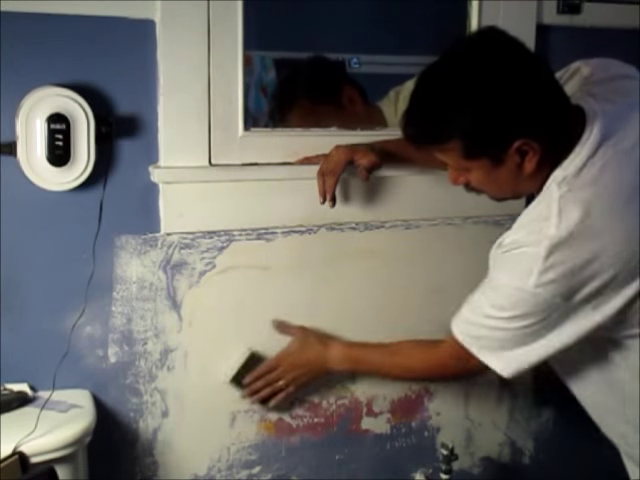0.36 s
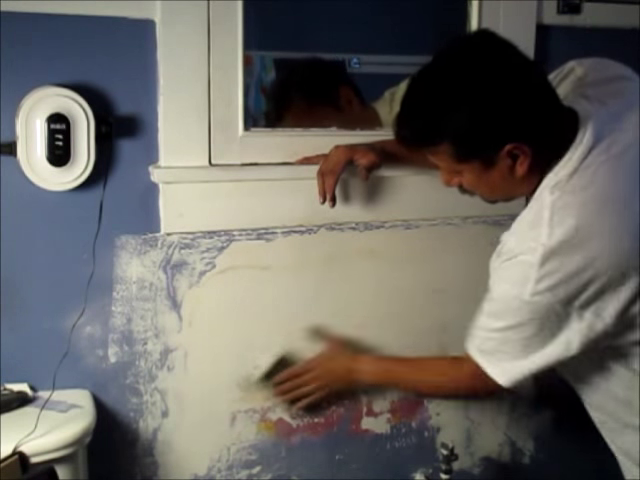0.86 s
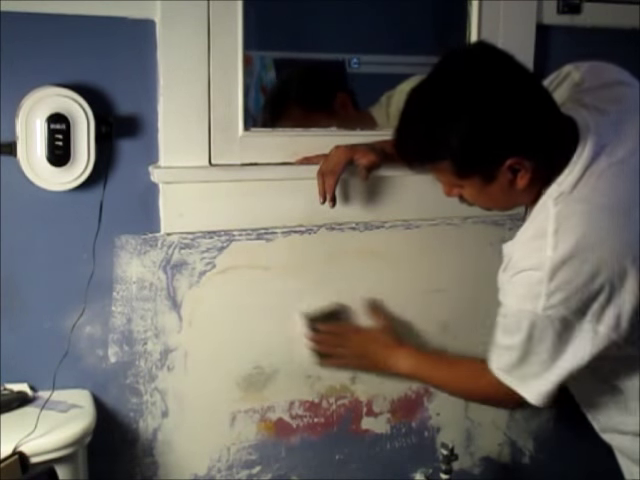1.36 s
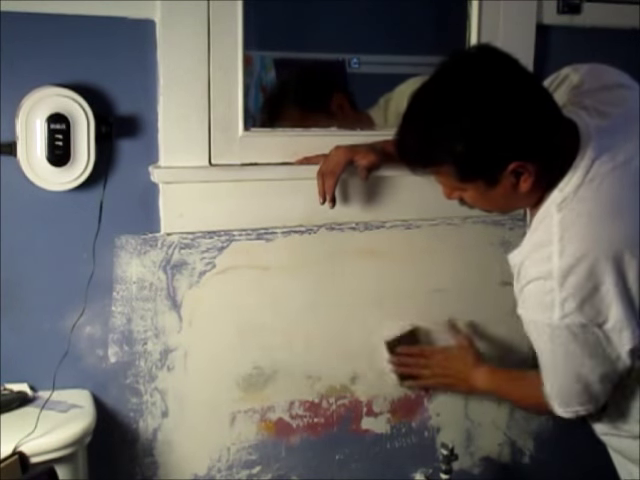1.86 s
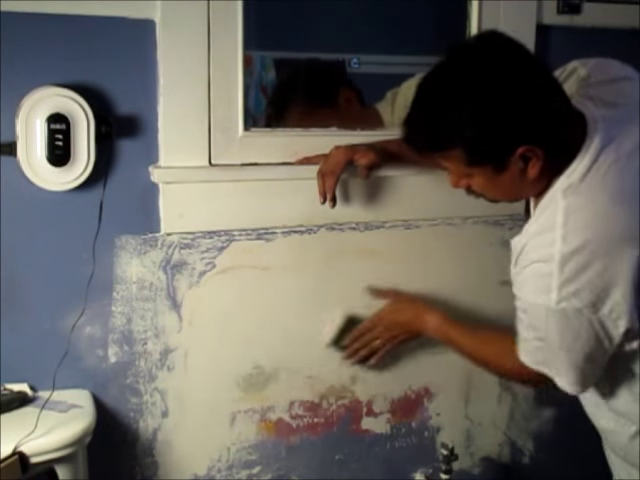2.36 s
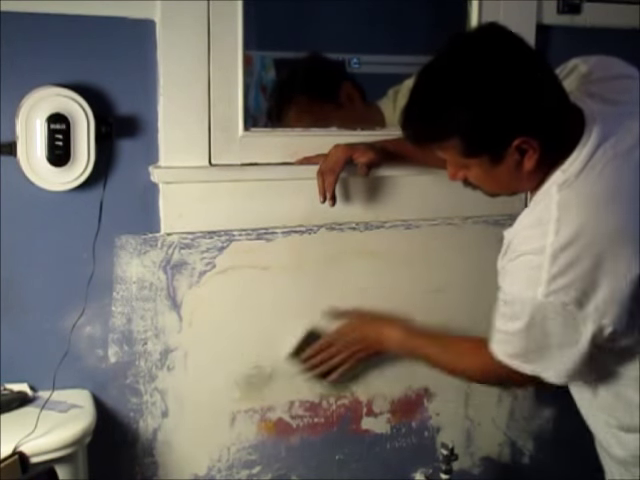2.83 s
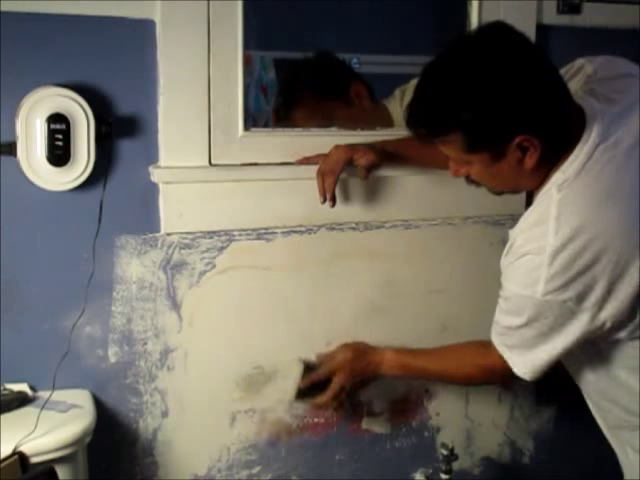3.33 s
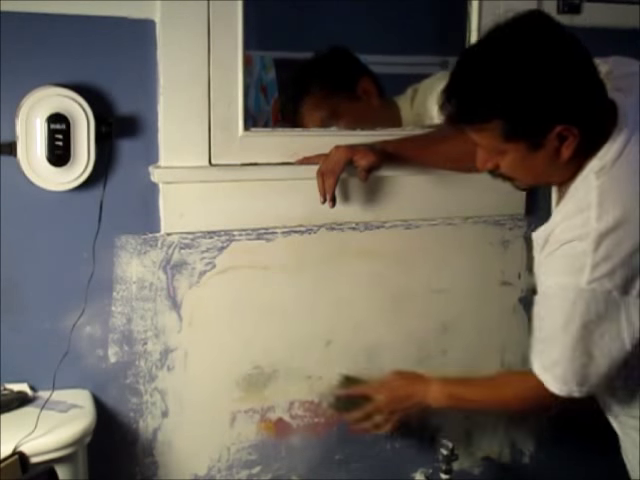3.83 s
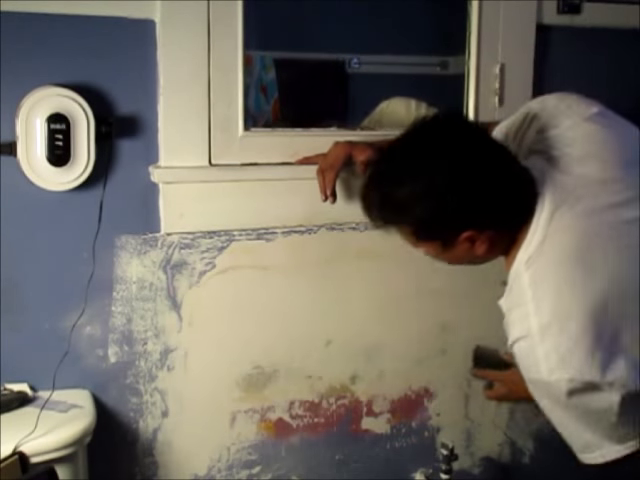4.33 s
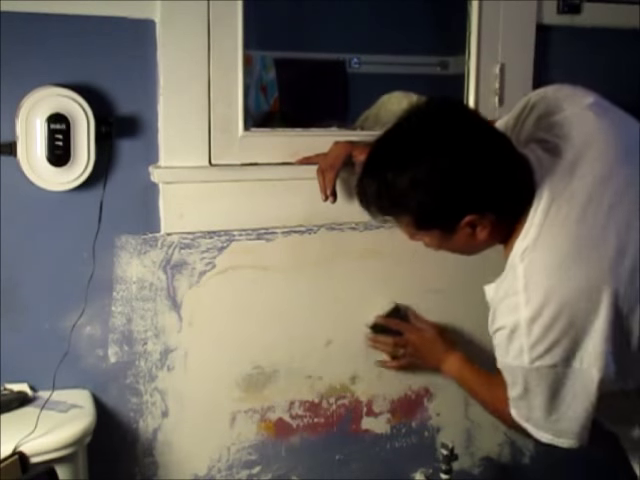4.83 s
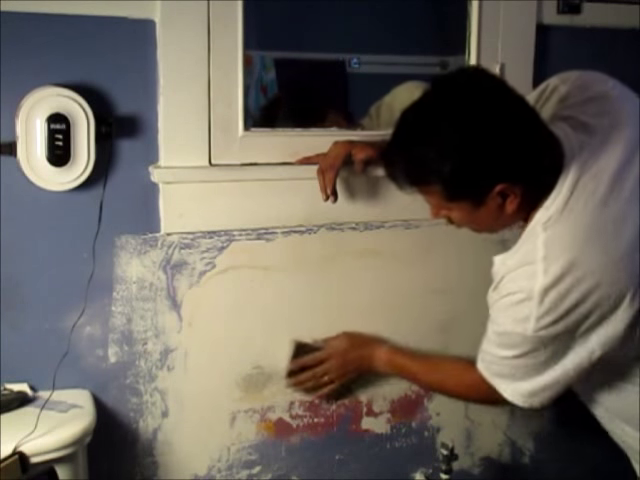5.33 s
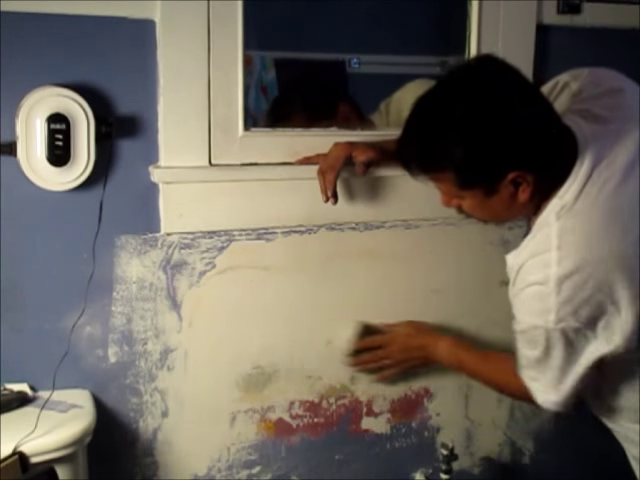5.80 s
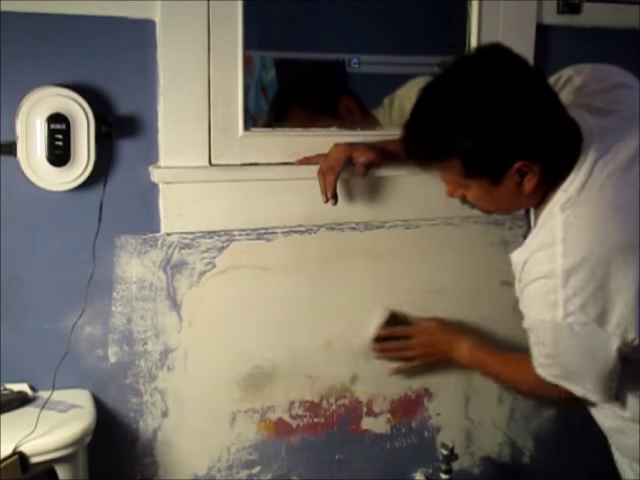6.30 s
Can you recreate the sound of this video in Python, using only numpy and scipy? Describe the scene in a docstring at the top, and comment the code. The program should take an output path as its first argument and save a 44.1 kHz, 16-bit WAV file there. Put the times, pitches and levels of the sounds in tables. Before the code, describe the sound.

Close up in a small bare room, a sanding pad scrubs a hollow plaster wall, about four or five hissing strokes a second, with soft low drumming at the turns. The strokes stop with a faint squeak; three evenly spaced, echoing slaps knock the pad clean, then comes a short soft wipe. Sanding resumes with small squeals and runs to the end over a quiet hush.

```python
"""Sanding a hollow wall

A sanding pad scrubs to and fro over a hollow plaster wall in a small bare room, close to one microphone.
Coloured noise grains make the grit hiss, which follows the hand speed; ringing modes make the wall drum.
Wavering sine tones make the pad's squeals. In the pause the pad is knocked clean three times, with
echoing slaps and short ticks, and wiped once, with swelling noise. A quiet hush lies under it all."""
import sys
import numpy as np
from scipy import signal
from scipy.fft import rfft, irfft
from scipy.io import wavfile
from scipy.ndimage import uniform_filter1d

SR = 44100
rng = np.random.default_rng(int(sys.argv[2]) if len(sys.argv) > 2 else 0)


def wav_record(signal):
    """Record a signal, one row per channel, as 16-bit PCM in the file named by sys.argv[1]."""
    frames = np.transpose(np.atleast_2d(signal))
    bounded = np.clip(frames, -1, 1)
    # unit amplitude maps onto the largest positive 16-bit level
    quanta = np.round(bounded * 32767).astype(np.int16)
    wavfile.write(sys.argv[1], SR, quanta)


def decibels_to_gain(level_db):
    """Convert a level in decibels to a linear amplitude gain (20 dB per decade)."""
    exponent = np.asarray(level_db, float) / 20
    return 10 ** exponent


N = 294147
TIME = np.arange(N) / SR  # s

# Background hush, its tone: (f/Hz, level/dB)
HUSH_TONE = [(30, -21), (60, 3.5), (170, -5), (220, -12), (380, -21), (530, -4.5), (620, -9.5), (1300, -14),
             (1500, -13), (1700, -14), (2100, -24), (4500, -27.5), (9000, -20.5), (15800, -33)]
# How long the bare room echoes: (f/Hz, time to fall by 60 dB/s)
ROOM_DECAY = [(100, 0.79), (280, 0.56), (500, 0.41), (1500, 0.33), (4000, 0.32), (9000, 0.19),
              (15000, 0.22)]
# Ringing modes of the hollow wall: (f/Hz, level/dB, time to fall by 60 dB/s)
WALL_MODES = [(71, -4.5, .25), (108.2, -8, 0.23), (132.7, 4, 0.088), (159.9, -1, 0.17), (242, -1.5, 0.13),
              (306, 0.5, 0.092), (396.3, -3, 0.088), (497.1, -10, 0.38), (595, -11.5, 0.26),
              (830, -2.5, 0.27)]
# The hand shoves off near each turn: (t/s, deep modes level/dB, upper modes level/dB, fade/dB per s)
PUSHES = [(0.039, -31.5, -40, 76), (0.235, -26.5, -36.5, 154), (0.46, -35, -47, 122),
          (0.635, -31, -60, 130), (0.875, -36.5, -37, 107), (1.13, -32, -56, 120), (1.4, -41, -43, 100),
          (1.545, -35.5, -60, 162), (1.755, -29, -34.5, 130), (1.995, -39, -66, 100),
          (2.21, -23.5, -30.5, 79), (2.59, -28.5, -35, 88), (2.81, -39, -31, 78), (4.85, -41, -29.5, 61),
          (5.09, -38, -47, 150), (5.19, -56, -40, 44), (5.55, -42, -44, 130), (5.755, -40, -32, 68),
          (6.11, -27, -31, 132.5), (6.535, -34.5, -42.5, 115)]
# Wipe, and the pad settling on the wall again:
# (loudest t/s, level/dB, swell/dB per s, fade/dB per s, treble re level/dB)
WIPE = [(4.285, -46, 300, 47, 1), (4.386, -26, 204, 139, -6), (4.475, -29, 700, 151, -11.5),
        (4.8, -38.5, 189, 25, -35)]
# Tone of the rub on cloth: (f/Hz, level/dB)
CLOTH_TONE = [(120, -30.5), (200, -14), (233, -2), (272, -3), (463, -3.5), (552, -6.5), (1040, -1),
              (1260, -4.5), (2800, -11.5), (3640, -37), (6160, -120)]
# Tone of its treble layer: (f/Hz, level/dB)
CLOTH_TREBLE_TONE = [(1530, -36), (2600, -6), (3490, -2.5), (4830, -10), (7890, -12.5), (10800, -15.5),
                     (15800, -31)]
# Squeals of the pad edge; each fades out at 1.3 lengths:
# (start t/s, length/s, f/Hz, pitch wander/Hz, glide/Hz per s, level/dB)
SQUEALS = [(2.786, .17, 636, 65, -0.5, -30), (2.832, 0.15, 399, 10.7, -200, -33),
           (4.852, 0.067, 699, 70, 499, -28.5), (4.873, 0.17, 937, 2.6, -1.5, -28.5),
           (4.878, 0.075, 560, 45, 1, -32.5), (5.297, 0.09, 876, 16, 500, -26.5),
           (5.406, 0.083, 967, 8.5, -3.5, -32)]
# Knocks: (edge tick t/s, slap level/dB, slap brightness f/Hz, treble at 8 kHz re slap/dB,
# push on the wall/dB, edge tick level/dB, edge tick f/Hz)
KNOCKS = [(3.2356, -15.5, 1670, -25.5, -9, -14, 1310), (3.4411, -17, 1740, -25, -11, 1, 1870),
          (3.6465, -15, 2620, -18, -17, 5.5, 3540)]
# Strokes: (start t/s, length/s, grit level midway/dB, gain from start to end/dB, pad body level/dB)
STROKES = [(-0.18, 0.22, -21, 4, -28.5), (0.026, 0.2, -16.5, 5, -28.5), (0.213, 0.22, -16, -1, -28),
           (0.414, 0.23, -16, 5.5, -28), (0.631, 0.25, -17.5, -9, -28.5), (0.86, 0.26, -16, 6, -30.5),
           (1.103, 0.25, -18.5, -2.5, -28.5), (1.338, 0.21, -16.5, 1.5, -30), (1.536, 0.24, -21, -7, -30),
           (1.752, 0.22, -17, 3, -30), (1.968, 0.26, -18.5, 3, -28.5), (2.212, 0.19, -19, 7, -26.5),
           (2.39, 0.21, -17, 9, -28.5), (2.585, 0.24, -17, -2.5, -27), (2.8, 0.23, -19.5, -15, -33.5),
           (4.854, 0.21, -21, 10, -25.5), (5.058, 0.15, -17.5, 10, -27.5), (5.195, 0.17, -19.5, -10, -26),
           (5.349, 0.17, -17.5, 8, -26), (5.517, 0.21, -17.5, -5.5, -27), (5.715, 0.2, -17.5, 6, -24),
           (5.886, 0.25, -18, -3, -29), (6.118, 0.21, -15.5, -0.5, -28.5), (6.306, 0.26, -16.5, -3, -30),
           (6.538, 0.16, -15.5, 1.5, -25.5)]
# Light contact as the pad leaves the wall and comes back:
# (loudest t/s, grit level/dB, swell/dB per s, fade/dB per s)
GRAZES = [(3.0, -43, 300, 156), (3.13, -41.5, 60, 7.5), (4.87, -47, 80, 300)]
# Tone of the grit: (f/Hz, level/dB)
GRIT_TONE = [(880, -22), (1500, -7), (1880, -7), (2630, -1.5), (4830, 0), (7240, -4.5), (7860, -3.5),
             (9000, -9), (11700, -17.5), (19800, -120)]
# Tone of the sizzle, the top of the scratch: (f/Hz, level/dB)
SIZZLE_TONE = [(5000, -24), (8500, -2), (13400, -8.5), (15100, -13), (15800, -44.5)]
# Tone of the pad body: (f/Hz, level/dB)
BODY_TONE = [(280, -24.5), (480, -9.5), (777, -6.5), (922, -4.5), (996, 1.5), (1080, -3.5), (1600, -0.5),
             (2340, -3), (4500, -18), (9000, -60)]

HUSH_DB = -44
UPPER_HZ = 210  # wall modes above this count as upper, the others as deep
STEADY_DEEP_DB, STEADY_UPPER_DB = -57, -60  # drumming while the pad is on the wall
PUSH_RISE_S = 0.037
THUMP_S, THUMP_DB, THUMP_SWELL_DB_PER_S, THUMP_FADE_DB_PER_S = 4.365, -28.5, 900, 220
CRUISE = 1.29  # how soon the hand reaches its full speed and holds it
SPEED_POWER, BODY_SPEED_POWER = 1.26, 0.43  # how sharply loudness follows the hand speed
SIZZLE_DB, SIZZLE_FADE_DB = -9.5, -8  # midway, re grit; change from start to end of a stroke
MIC_LOW_HZ, NOTCH_HZ, NOTCH_WIDTH_HZ = 53.4, 7880, 400
DRIFT_DB, DRIFT_HZ = -53, 25


def level(x, db):
    """Scale to an rms level."""
    return x * decibels_to_gain(db) / np.sqrt(np.mean(x ** 2))


def colour(x, points):
    """Shape the tone by (f/Hz, level/dB) points, then bring it to rms 1."""
    hz, db = np.transpose(points)
    f = np.maximum(np.fft.rfftfreq(len(x), 1 / SR), 1)
    gain = decibels_to_gain(np.interp(np.log(f), np.log(hz), db))
    return level(irfft(rfft(x) * gain, len(x)), 0)


def walk(rate):
    """Random values, `rate` new ones per second, smoothed into each other; spread near 1."""
    k = int(SR / rate)
    steps = np.repeat(rng.standard_normal(N // k + 1), k)
    return 1.4 * uniform_filter1d(uniform_filter1d(steps, k), k)[:N]


def swell(s, db, rise_db, fall_db):
    """Gain that climbs to its top at s and sinks after it, both in dB per second."""
    return decibels_to_gain(db - rise_db * np.maximum(s - TIME, 0) - fall_db * np.maximum(TIME - s, 0))


def grains(spread_db):
    """One tiny catch at every sample, a few much larger than the rest."""
    return rng.standard_normal(N) * decibels_to_gain(spread_db * rng.exponential(size=N))


def strokes():
    """For each stroke its row, the way done from its middle, and the hand speed, which is nil at the turns."""
    for row in STROKES:
        way = np.clip((TIME - row[0]) / row[1], 0, 1)
        speed = np.tanh(CRUISE * np.abs(np.sin(np.pi * way))) / np.tanh(CRUISE)
        yield row, way - 0.5, speed * (way < 1)


def hush():
    """Quiet coloured noise whose level wavers slightly."""
    return decibels_to_gain(HUSH_DB + 0.27 * walk(6.9)) * colour(rng.standard_normal(N), HUSH_TONE)


def echoes():
    """Dense echoes from bare walls as heard from one spot; the treble mostly dies sooner."""
    t, tail = TIME[:SR // 2], 0
    f = np.fft.rfftfreq(len(t), 1 / SR)
    hz = np.transpose(ROOM_DECAY)[0]
    # overlapping bands of noise, each with its own decay
    for (_, t60), tent in zip(ROOM_DECAY, np.eye(len(ROOM_DECAY))):
        noise = rfft(rng.standard_normal(len(t)))
        band = irfft(noise * np.sqrt(np.interp(f, hz, tent)), len(t))
        tail = tail + band * 1000 ** (-t / t60)
    tail = tail * np.minimum(t / 0.0015, 1)
    return tail / np.sqrt(np.sum(tail ** 2))


def room(x, wet_db):
    """The hand keeps moving, so every tenth of a second sends its sound into other echoes."""
    hop = SR // 10
    spots = [echoes() for _ in range(8)]
    padded = np.pad(x, (hop, 2 * hop))
    wet = np.zeros(N + 4 * hop + SR)
    for k, i in enumerate(range(0, N + hop, hop)):
        piece = padded[i:i + 2 * hop] * np.hanning(2 * hop)  # pieces overlap by half
        part = signal.fftconvolve(piece, spots[k % len(spots)])
        wet[i:i + len(part)] += part
    return x + decibels_to_gain(wet_db) * wet[hop:hop + N]


def wall(force, modes=WALL_MODES):
    """The hollow wall rings in its modes; the cavity takes a moment to fill."""
    t = TIME[:SR // 2]
    ring = sum(decibels_to_gain(db) * np.sin(2 * np.pi * hz * t) * 1000 ** (-t / t60) for hz, db, t60 in modes)
    fill = 1 - np.exp(-t / 0.0067)
    return signal.fftconvolve(force, ring * fill)[:N]


def drumming():
    """The pressing hand shakes the wall, most just after each turn; deep and upper modes answer differently."""
    out = 0
    all_speed = sum(speed for _, _, speed in strokes())
    touching = uniform_filter1d(all_speed ** 0.19, SR // 20)
    deep = [m for m in WALL_MODES if m[0] < UPPER_HZ]
    upper = [m for m in WALL_MODES if m[0] > UPPER_HZ]
    for k, (modes, steady_db) in enumerate(((deep, STEADY_DEEP_DB), (upper, STEADY_UPPER_DB))):
        shake = wall(rng.standard_normal(N), modes)
        # even out the loudness, so that the force alone sets it
        shake = shake / np.sqrt(uniform_filter1d(shake ** 2, SR // 20) + 1e-9)
        force = decibels_to_gain(steady_db + 3.4 * walk(12)) * touching
        for s, *levels_db, fall_db in PUSHES:
            rise = np.clip((TIME - s) / PUSH_RISE_S, 0, 1)
            force = force + rise * swell(s + PUSH_RISE_S, levels_db[k], 0, fall_db)
        out = out + force * shake
    return out


def wipe():
    """The pad is dragged over cloth, a flickering rub of noise grains, with a soft thump of low noise."""
    rub = colour(grains(1.3), CLOTH_TONE)
    treble = colour(grains(2.2), CLOTH_TREBLE_TONE)
    thump = colour(rng.standard_normal(N), [(50, -8), (124, 13), (240, -17), (330, -52)])
    drag = 0
    for s, db, rise_db, fall_db, treble_db in WIPE:
        drag = drag + swell(s, db, rise_db, fall_db) * (rub + decibels_to_gain(treble_db) * treble)
    thump_gain = swell(THUMP_S, THUMP_DB, THUMP_SWELL_DB_PER_S, THUMP_FADE_DB_PER_S)
    return decibels_to_gain(1.9 * walk(50)) * drag + thump_gain * thump


def squeals():
    """Stick-slip of the pad edge holds a wavering tone for a moment."""
    out = np.zeros(N)
    for s, length, hz, wander_hz, glide_hz, db in SQUEALS:
        u = (TIME - s) / length
        shape = np.clip(u / 0.096, 0, 1) * np.clip((1.3 - u) / 0.52, 0, 1)  # fade in, fade out
        pitch = hz + glide_hz * (TIME - s) + wander_hz * walk(120)
        tone = np.sqrt(2) * np.sin(2 * np.pi * np.cumsum(pitch) / SR)
        out += shape * decibels_to_gain(db + 2.4 * walk(60)) * tone
    return out


def knocks():
    """The soft face lands first and spreads into the room's echoes; then the edge ticks; the wall gets a push."""
    direct, push = np.zeros(N), np.zeros(N)
    t = TIME[:SR // 2]
    for s, slap_db, bright_hz, treble_db, wall_db, tick_db, tick_hz in KNOCKS:
        i, j = int((s - 0.003) * SR), int(s * SR)  # the face lands 3 ms before the edge
        tone = [(50, -10), (250, 0), (bright_hz, -3), (2 * bright_hz, 0.68 * treble_db),
                (8000, treble_db), (16000, 1.77 * treble_db)]
        burst = echoes() * (1 + 0.62 * np.exp(-t / 0.0024))  # stronger at first
        slap = colour(burst, tone) * np.minimum(t / 0.0026, 1)
        direct[i:i + len(t)] += decibels_to_gain(slap_db) * slap / np.std(slap[:SR // 20])
        turns = tick_hz * t / 0.5
        tick = np.sin(2 * np.pi * tick_hz * t) * turns * np.exp(1 - turns)
        direct[j:j + len(t)] += decibels_to_gain(tick_db) * tick
        push[i:i + 150] += decibels_to_gain(wall_db) * np.hanning(150) / 75
    return direct + wall(push)


def sanding():
    """Grit tears at the plaster; each layer flickers as the pad crosses ridges."""
    grit = colour(grains(0.81), GRIT_TONE) * decibels_to_gain(0.76 * walk(40) + 0.72 * walk(14))
    sizzle = colour(grains(1.9), SIZZLE_TONE) * decibels_to_gain(2.6 * walk(30))
    body = colour(grains(2.1), BODY_TONE) * decibels_to_gain(2.6 * walk(20))
    out = sum(swell(*row) for row in GRAZES) * (grit + decibels_to_gain(SIZZLE_DB) * sizzle)
    for (_, _, db, lean_db, body_db), way, speed in strokes():
        scratch = grit + decibels_to_gain(SIZZLE_DB + SIZZLE_FADE_DB * way) * sizzle
        out = out + decibels_to_gain(db + lean_db * way) * speed ** SPEED_POWER * scratch
        out = out + decibels_to_gain(body_db) * speed ** BODY_SPEED_POWER * body
    return out


def scene():
    """All sources reach one microphone."""
    mono = hush() + drumming() + room(sanding() + wipe(), -6) + room(squeals(), -6) + knocks()
    return np.array([mono, mono])


def band_limit(x):
    """A steep low-pass at the top of the band."""
    return signal.sosfilt(signal.butter(12, 16440, fs=SR, output="sos"), x)


def record(dry):
    """The small microphone drops the deep bass; a narrow gap is cut near 7.9 kHz, a slow drift added; peaks clip."""
    thin = signal.sosfilt(signal.butter(4, MIC_LOW_HZ, "high", fs=SR, output="sos"), dry)
    notched = signal.lfilter(*signal.iirnotch(NOTCH_HZ, NOTCH_HZ / NOTCH_WIDTH_HZ, SR), thin)
    drift_tone = [(5, -10), (DRIFT_HZ, 0), (40, -6), (100, -60)]
    drift = decibels_to_gain(DRIFT_DB) * colour(rng.standard_normal(N), drift_tone)
    return band_limit(np.clip(notched + drift, -1, 1))


dry = scene()
out = record(dry)
wav_record(out)
```